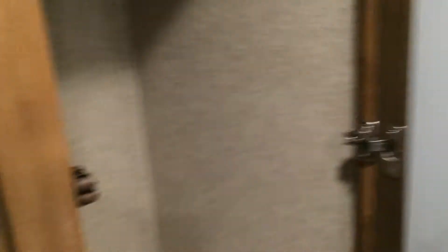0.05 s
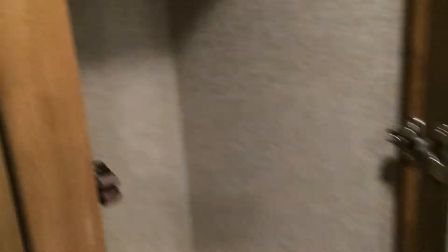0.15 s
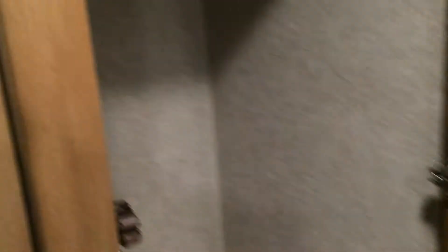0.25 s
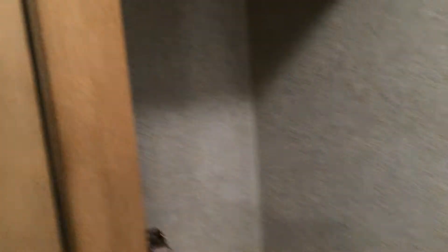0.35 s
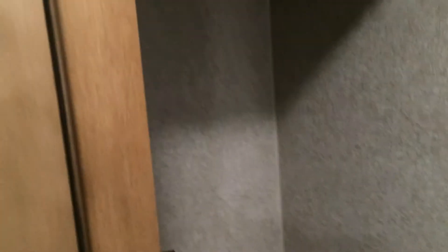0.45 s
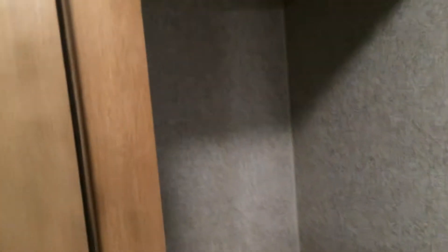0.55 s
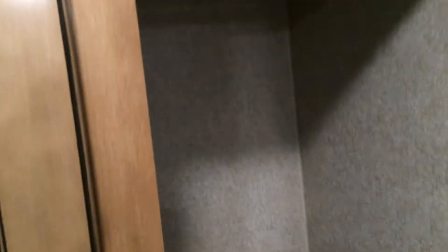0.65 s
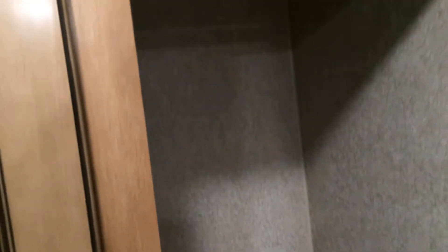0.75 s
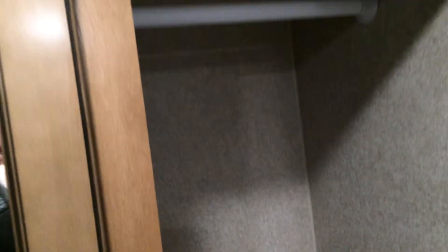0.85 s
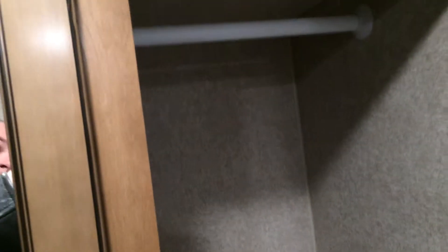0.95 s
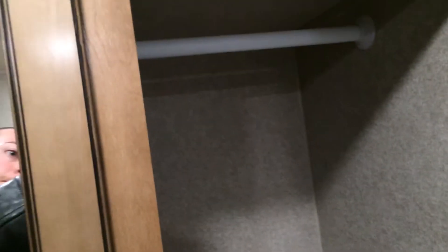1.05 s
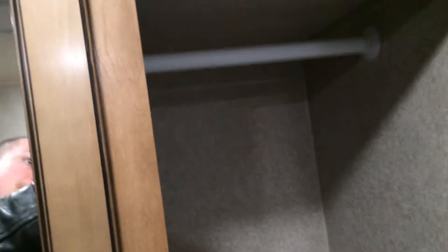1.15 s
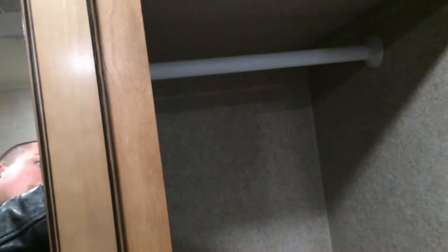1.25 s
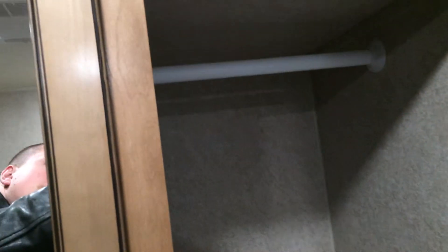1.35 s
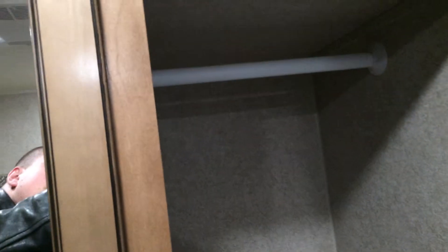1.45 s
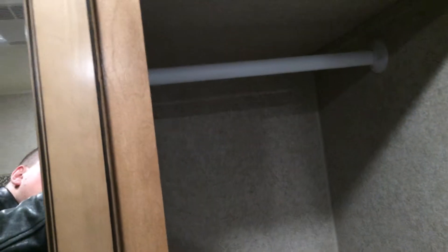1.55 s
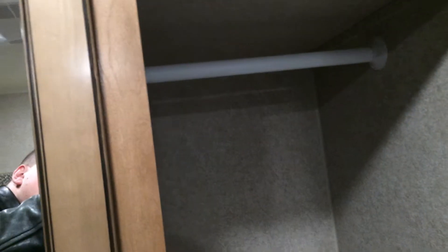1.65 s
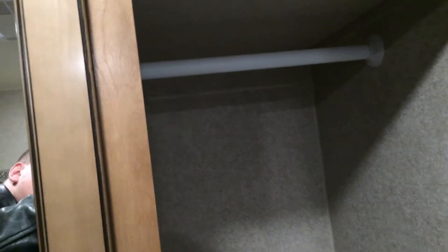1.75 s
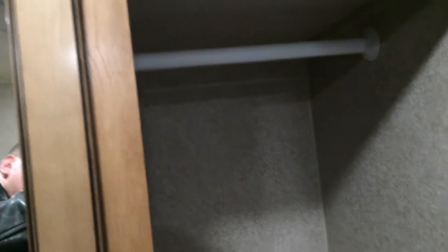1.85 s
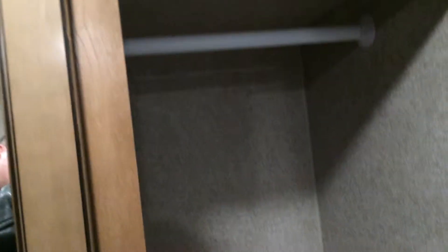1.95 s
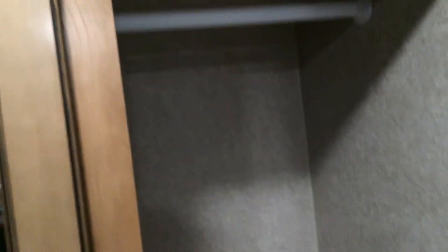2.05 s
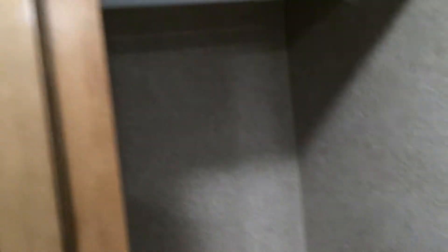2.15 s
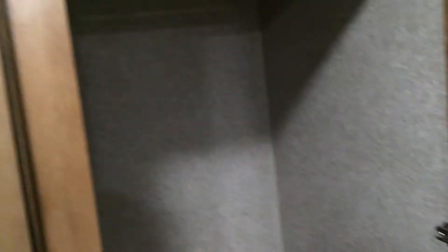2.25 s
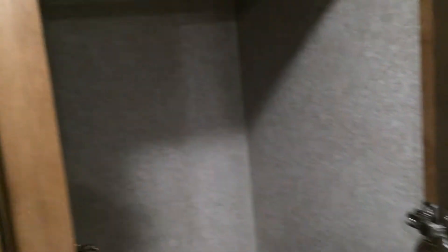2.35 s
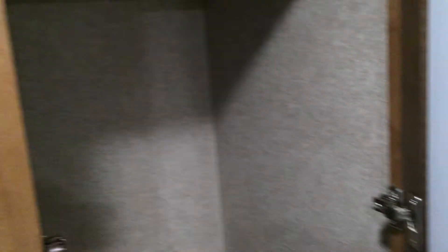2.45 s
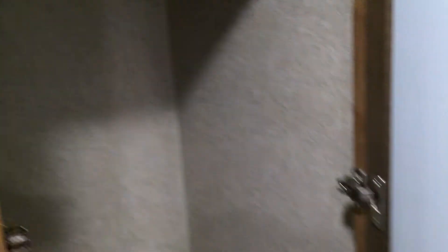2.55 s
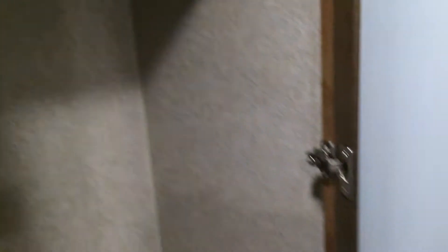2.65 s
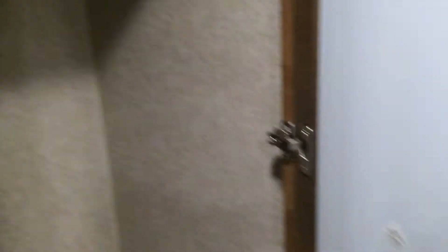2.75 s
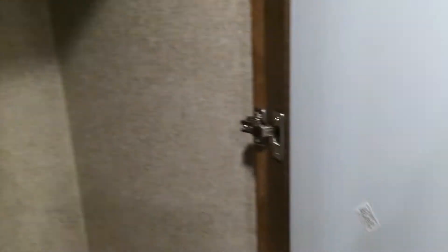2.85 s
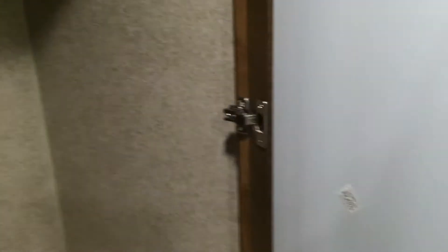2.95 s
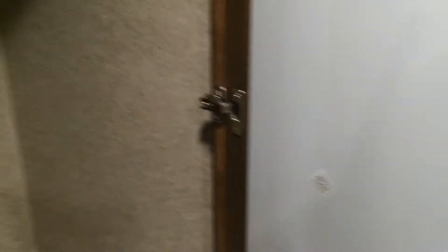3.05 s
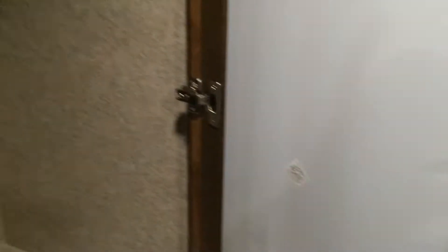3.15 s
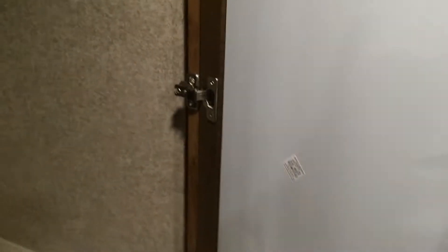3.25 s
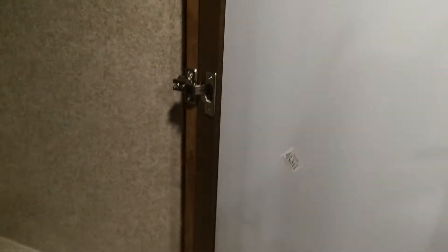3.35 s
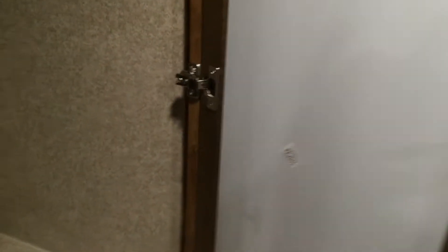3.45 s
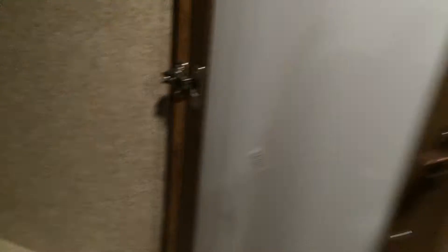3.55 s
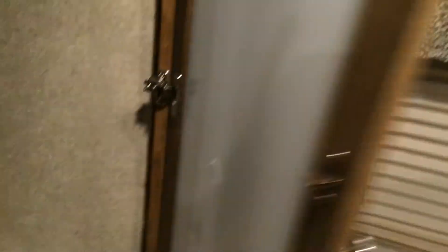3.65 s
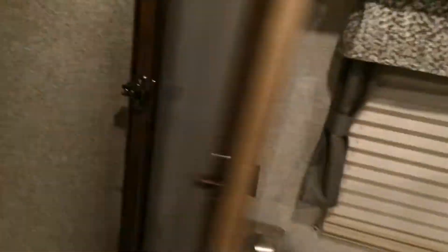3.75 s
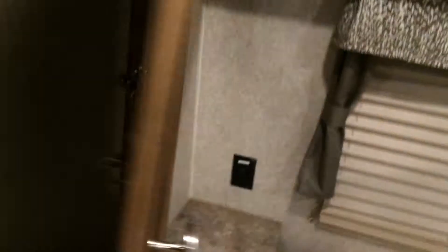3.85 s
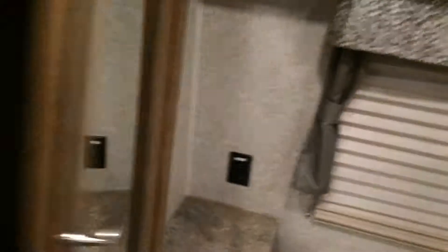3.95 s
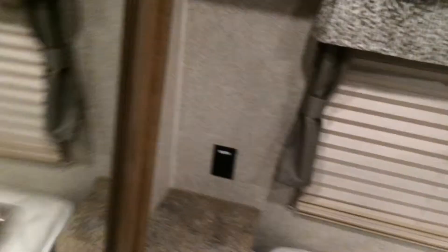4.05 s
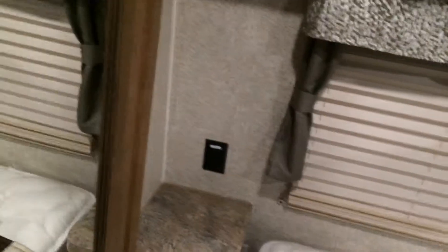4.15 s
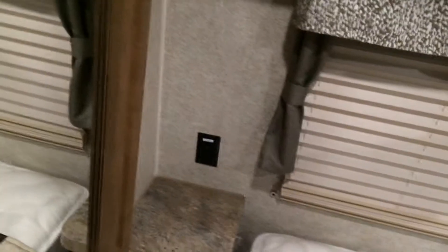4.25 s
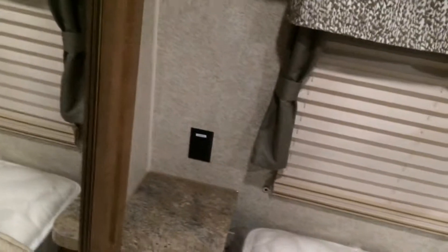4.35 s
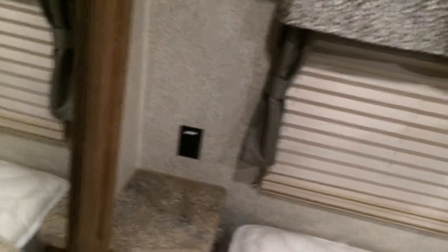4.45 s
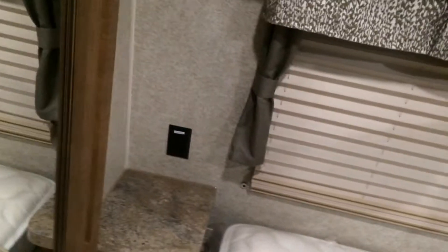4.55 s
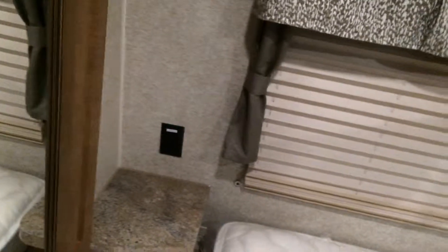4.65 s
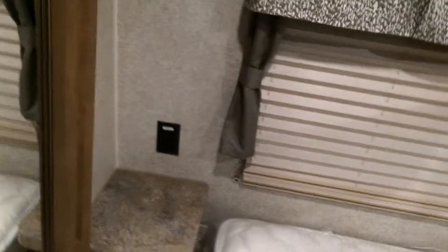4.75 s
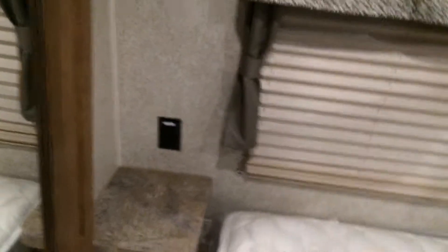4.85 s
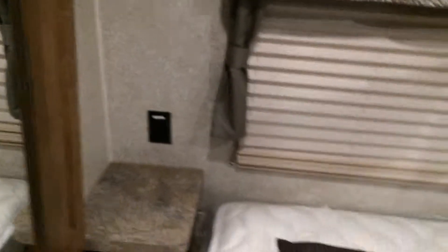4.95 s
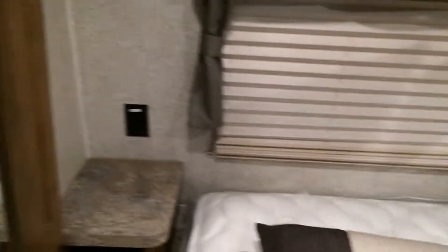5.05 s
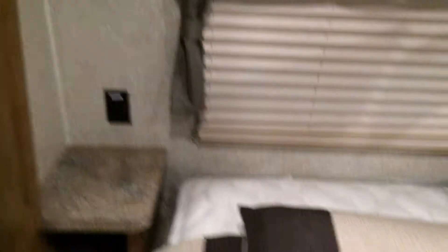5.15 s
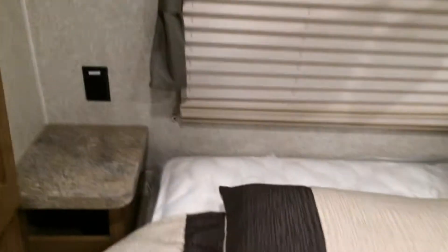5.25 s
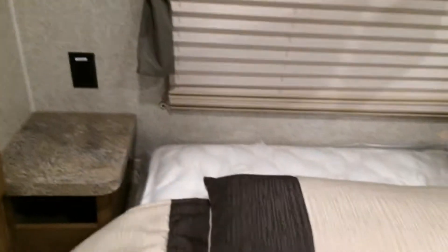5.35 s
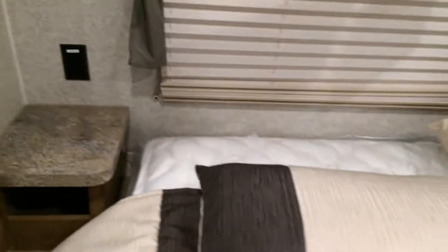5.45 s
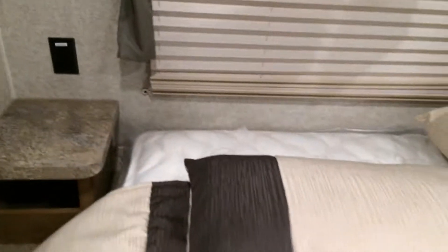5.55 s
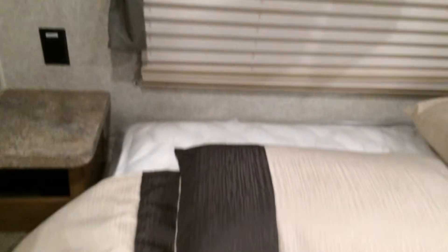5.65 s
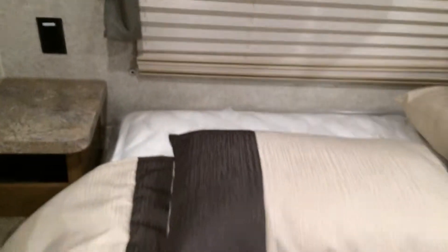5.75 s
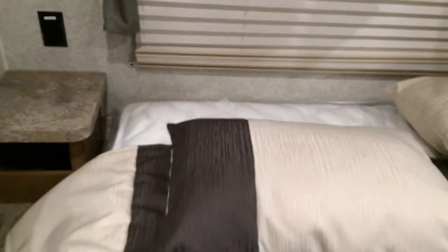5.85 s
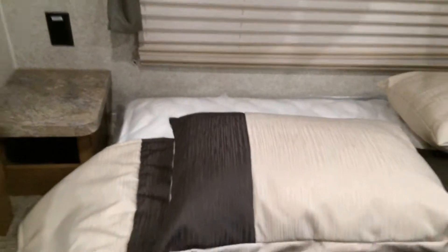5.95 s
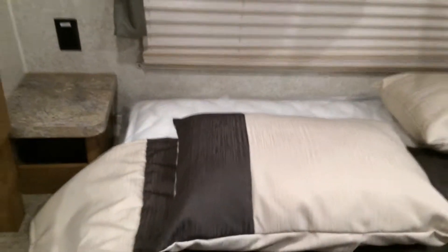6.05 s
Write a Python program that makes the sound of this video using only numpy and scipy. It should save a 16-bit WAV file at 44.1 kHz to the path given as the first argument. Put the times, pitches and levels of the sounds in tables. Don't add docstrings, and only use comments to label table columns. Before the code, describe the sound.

A small padded trailer with a steady, faint hush, heard through a small microphone near a person in a stiff jacket. From 0 to about 1 second the cloth rustles fairly strongly, hissing and creaking, with crisp snaps and a dull tap at 0.2 and 0.5. Soft low heel thumps begin near 0.7 and make the light floor sway. From 1 to 2.3 the rustle thins, with small ticks and light brushes; sharper snaps come at 2.25 and 2.6. Quieter shifting and soft steps follow, around 3.4 especially. At 4.2 a metal roller catch scrapes briefly and a wardrobe door knocks shut at 4.24, by far the loudest sound: a hard woody crack, rapid low rebounds, a shuddering panel and a short cabin ring. Steps follow at 4.4, then rustling swells again from 5 to 5.8, with snaps near 5.4, fading into gentle cloth movement by 6.

```python
import sys
import numpy as np
from scipy import signal
from scipy.io import wavfile

SR = 44100
rng = np.random.default_rng(int(sys.argv[2]) if len(sys.argv) > 2 else 0)


def unload_wav(signal):
    wavfile.write(
        sys.argv[1],
        SR,
        np.round(np.clip(np.atleast_2d(signal).T, -1, 1) * 32767).astype(np.int16),
    )


def gain_from_db(level_db):
    decades = np.asarray(level_db, float) / 20
    return 10 ** decades


N = 268613

# frequency in Hz, level in dB per Hz.
HUSH_COLOUR = [(20, -20), (35, 1.5), (120, -4), (200, -21), (330, 0), (600, -5), (1300, -9.5),
               (2500, -29.5), (4000, -16.5), (14000, -26.5), (15500, -31)]
# frequency in Hz, width in Hz, gain in dB.
WALL_COLOUR = [(185, 68, 8.5), (2365, 340, 2.5), (2740, 202, -2.5)]
# time in seconds, rustle in dB, body weight going with it in dB.
EFFORT = [(0, -51.5, 4), (.088, -42, 0), (.15, -47.5, 2), (.3, -57.5, 2.5), (.53, -47.5, -3),
          (.94, -58.5, 0), (1.5, -65.5, 0), (2.1, -74.5, 3.5), (2.7, -53.5, -3), (2.92, -64, 0.5),
          (3.25, -60, 0), (3.52, -71.5, 1.5), (4.1, -63, 7.5), (4.8, -67, -2.5), (5.03, -56.5, 1),
          (5.3, -51.5, -1.5), (5.79, -56, 2), (5.87, -64.5, 1)]
# peak in seconds, brightening in dB, rise in s, fade in s.
BRUSHES = [(.088, 4.5, 0.073, 0.064), (.19, 3.5, .01, .08), (.456, 7, .004, .05), (.535, 3, 0.052, .05),
           (1.21, 3.5, .05, 0.027), (1.4, 1, .02, .04), (1.54, 18, 0.011, 0.041), (1.81, 15.5, .02, 0.14),
           (1.92, 19.5, 0.027, .05), (2.16, 22.5, 0.022, 0.1), (2.25, 16, 0.008, 0.12),
           (2.36, 9, 0.02, 0.08), (2.6, 7.5, 0.052, 0.018), (2.89, 13, 0.098, .025), (3.29, 2, 0.055, 0.15),
           (3.44, 13.5, 0.034, 0.12), (3.568, 14.5, .015, 0.082), (3.774, 16, 0.22, 0.049),
           (4.04, 0, 0.058, 0.033), (4.852, 5.5, 0.016, 0.033), (5.175, 5.5, 0.025, .04),
           (5.24, 4.5, 0.035, .06), (5.447, 7.5, 0.19, 0.04), (5.635, 5.5, 0.037, 0.033),
           (5.76, 4.5, 0.05, 0.021), (6.05, 7, 0.048, 0.11)]
# frequency in Hz, level in dB per Hz.
CLOTH_COLOUR = [(290, -38.5), (500, -18), (603, -3), (803, -1.5), (1040, -1), (1880, 3), (2390, -2),
                (2930, -5), (6090, -10), (10500, -19), (14600, -32), (15500, -34)]
# start in seconds, peak in dB, pitch in Hz, smear in dB under the snap.
SNAPS = [(.269, -37.5, 1660, -2), (.341, -33, 2350, -19), (.454, -38, 2240, -12), (.829, -41.5, 634, -24),
         (1.014, -45.5, 2000, 2), (1.292, -48, 576, 6), (1.359, -49.5, 1740, -1), (1.535, -43.5, 640, 0),
         (1.805, -47, 447, -13), (2.25, -30.5, 2180, -9), (2.356, -42, 1740, -8), (2.578, -28, 2290, -16),
         (2.585, -29.5, 2070, -17), (2.734, -39.5, 1650, 0), (2.981, -45.5, 680, -5),
         (3.055, -40.5, 1960, -1), (3.274, -43.5, 1780, -1), (3.429, -68, 700, -9), (3.767, -42, 1390, -4),
         (4.106, -48, 920, -5), (4.846, -41.5, 1010, -1), (5.357, -37.5, 2250, 7), (5.426, -31, 2500, -4.5),
         (6.035, -45, 2330, -1)]
# start in seconds, peak in dB, pitch in Hz, relative smear in dB.
CREASES = [(.05, -53, 1430, -14), (.409, -42, 2200, -9), (.478, -31.5, 820, -15), (.661, -37, 1850, 3),
           (.709, -41.5, 506, -2), (.752, -36.5, 2290, -18), (1.147, -40.5, 1760, 2),
           (1.205, -37.5, 2230, -16), (1.4, -35.5, 1380, -4.5), (1.91, -42, 1940, -3.5),
           (2.162, -45.5, 2210, 3), (2.28, -45, 2420, -7), (2.308, -44, 1540, -11),
           (2.657, -44.5, 1800, -5), (3.846, -44, 630, 0), (3.93, -48, 2250, -4), (3.976, -44.5, 1890, -4),
           (4.011, -36.5, 790, -10), (4.504, -57, 468, -9), (4.896, -41, 1920, -19),
           (4.938, -61, 1960, -12), (5.171, -32.5, 2370, 1), (5.264, -36, 1980, 3), (5.717, -35.5, 1880, 6)]
# start in seconds, peak in dB, pitch in Hz, relative smear in dB.
TAPS = [(.197, -24.5, 2430, -6), (.514, -31, 2020, 7), (.905, -34, 423, -2.5), (1.632, -40, 1170, -5),
        (1.838, -37, 590, 4), (2.18, -37.5, 510, 2), (2.518, -40, 2260, -1), (3.569, -40, 2440, 0),
        (3.647, -39, 1770, -13), (4.038, -33, 1810, -26), (4.132, -43.5, 2020, -11), (4.478, -39, 2810, -7),
        (4.794, -42.5, 2340, -19.5), (5.778, -39.5, 1870, -16), (5.875, -50.5, 401, -9),
        (5.948, -45, 1592, -6)]
# start in seconds, peak in dB, floor pitch in Hz, T60 in s, relative overtone in dB.
STEPS = [(0.663, -35, 63.2, 0.39, -3.5), (0.713, -40, 58.3, 0.65, -5), (1.532, -43, 71.2, 0.87, -1.5),
         (1.599, -47, 57.7, 0.6, -0.5), (2.337, -42, 70.2, 0.84, -20), (3.072, -46.5, 72, 0.67, -6),
         (3.414, -38, 61.7, 0.63, -25), (3.461, -34, 59.7, 0.36, -10), (3.544, -42, 69.7, 0.24, -24),
         (4.092, -39, 68, 0.36, -8), (4.425, -37, 74, 0.98, -15), (4.55, -36, 74, 0.31, -12),
         (5.304, -38, 75, 0.46, -26), (5.344, -39.5, 80.6, 0.34, -19), (5.403, -44, 78, 0.32, 3),
         (5.736, -36, 87, 0.19, -2)]
# time in seconds, scrape in dB.
CATCH_SCRAPE = [
    (4.2, -62),
    (4.2205, -48),
    (4.2222, -22),
    (4.227, -18),
    (4.231, -22),
    (4.2365, -24),
    (4.2385, -31),
    (4.242, -31),
]
# frequency in Hz, level in dB, T60 in s.
CATCH_MODES = [(1194, -16.5, .014), (2020, -1.5, .008), (2820, -3.5, 0.009), (3260, -2.5, 0.0097),
               (3750, -4.5, 0.0073)]
# start in seconds, push in dB, contact
# softness as top frequency in Hz.
BLOWS = [
    (4.205, -25, 120),
    (4.230, -15.5, 247),
    (4.242, -7.5, 401),
    (4.253, -12.5, 297),
    (4.262, -6.5, 398),
    (4.278, -7, 350),
    (4.289, -28, 298),
    (4.2971, -14.5, 249),
    (4.312, -16.5, 304),
    (4.331, -24, 250),
]
# frequency in Hz, level in dB, T60 in s.
PANEL_MODES = [(55.46, -6, 0.4), (74, -1.5, 0.78), (90.9, 4, 0.16), (111, -6, 0.32), (140.3, -1, 0.22),
               (164, -8.5, 0.34), (183.8, 2.5, 0.17), (206.6, -2.5, 0.24), (271.4, -7.5, 0.17),
               (290, -22, 0.13), (342, -16, 0.38), (382.7, -12, .3), (494, -17, 0.073)]
# frequency in Hz, level in dB, T60 in s.
FRAME_MODES = [(700, -12.5, 0.19), (868, -8, 0.28), (1196, 2, 0.13), (1304, -5, 0.17), (1597, -8, 0.49),
               (1750, -17.5, 0.14), (2100, -9.5, 0.095), (2840, 0, 0.095), (4180, -20, 0.121)]
# delay after it in seconds, level in dB, top frequency in Hz.
CONTACTS = [
    (.0003, -1, 11000),
    (.0017, -2, 7000),
    (.0034, -6, 5500),
]
# frequency in Hz, level in dB per Hz.
KNOCK_COLOUR = [(250, -5), (340, -9), (870, -3.5), (1200, -11), (2100, -6.5), (3000, -13), (4000, -13),
                (5200, -18), (6500, -21), (9700, -29), (15500, -58)]
# frequency in Hz, T60 in s.
KNOCK_T60 = [(250, 0.31), (600, 0.22), (1200, 0.29), (2500, 0.18), (2950, 0.11), (3400, 0.31), (5000, 0.31),
             (8000, 0.24), (14000, 0.082)]


def rms_one(x):
    return x / np.sqrt(np.mean(x ** 2) + 1e-20)


def in_time(rows):
    s, *columns = np.transpose(rows)
    return [np.interp(np.arange(N) / SR, s, column) for column in columns]


def at_hz(points, hz):
    points = np.array(points)
    return np.interp(np.log(hz), np.log(points[:, 0]), points[:, 1])


def add(out, s, piece):
    i = round(s * SR)
    out[i:i + len(piece)] += piece[:N - i]


def dying(t60, count):
    return gain_from_db(-60 * np.arange(count) / SR / max(t60, .003))


def drift(rate_hz):
    r = np.exp(-80 * np.pi * rate_hz / SR)
    white = rng.standard_normal(N // 40 + 2002)
    slow = signal.lfilter([1], [1, -2 * r, r * r], white)[2000:]
    return np.interp(np.arange(N) / 40, np.arange(len(slow)), rms_one(slow - slow.mean()))


def ring(clicks, hz, t60):
    r, w = gain_from_db(-60 / (t60 * SR)), 2 * np.pi * hz / SR
    return signal.lfilter([0, np.sin(w)], [1, -2 * r * np.cos(w), r * r], clicks + 1e-18)


def cut(x, hz, kind, order=2):
    return signal.sosfilt(signal.butter(order, hz, kind, fs=SR, output="sos"), x)


def bands(white, low_hz, count=3):
    edges = low_hz * 2 ** np.arange(0, np.log2(17000 / low_hz), 1 / count)
    for k, (low, high) in enumerate(zip(edges, edges[1:])):
        yield np.sqrt(low * high), cut(white[k % 2], [low, high], "band")


def bell(x, hz, width_hz, db):
    r, w = np.exp(-np.pi * width_hz / SR), 2 * np.pi * hz / SR
    top = np.array([1, 0, -1]) * (1 - r * r) / 2
    return x + (gain_from_db(db) - 1) * signal.lfilter(top, [1, -2 * r * np.cos(w), r * r], x)


def walls(x):
    for hz, width_hz, db in WALL_COLOUR:
        x = bell(x, hz, width_hz, db)
    return x


def cabin_air():
    slices = bands(rng.standard_normal((2, N)), 27.76)
    return gain_from_db(-67.5) * rms_one(sum(gain_from_db(at_hz(HUSH_COLOUR, hz)) * x for hz, x in slices))


def movement():
    effort_db, weight_db = in_time(EFFORT)
    t = np.arange(N) / SR
    brush_db = sum(np.interp(t, [s - rise_s, s, s + fade_s], [0, db, 0]) for s, db, rise_s, fade_s in BRUSHES)
    rustle_db = effort_db + 0.22 * brush_db
    bright_db = 0.63 * np.minimum(effort_db + 61, 0) + brush_db
    mean_db = effort_db.mean()
    rub_db = -4 + 0.99 * (effort_db - mean_db) + mean_db + weight_db
    rest_db, move_db, step_db, sway_t60 = -66.5, -7.5, -17, 2.03
    sway_power = gain_from_db(rest_db) ** 2 + gain_from_db(effort_db + move_db + 1.8 * weight_db) ** 2
    for s, peak_db, *_ in STEPS:
        add(sway_power, s, (gain_from_db(peak_db + step_db) * dying(sway_t60, SR)) ** 2)
    return rustle_db, bright_db, rub_db, 10 * np.log10(sway_power)


def floor_sway(sway_db):
    return gain_from_db(sway_db) * rms_one(cut(rng.standard_normal(N), [45, 130], "band"))


def rubbing(rub_db):
    pressure = gain_from_db(rub_db - 1.0 + 1.9 * drift(23))
    return pressure * rms_one(cut(rng.standard_normal(N), [150, 600], "band"))


def jacket(rustle_db, bright_db, grain_db, patchy_db, per_s):
    sizes = gain_from_db(grain_db * np.minimum(rng.exponential(1, (2, N)), 5)) * rng.standard_normal((2, N))
    grains = sizes * (rng.random((2, N)) < per_s / SR)
    folds = drift(3.3)
    tilt_db = bright_db - np.median(bright_db)
    total = 0
    for hz, x in bands(grains, 449, count=4):
        share = np.clip(np.log2(hz / 2500), 0, 1)
        swell_db = patchy_db * (1.26 * folds + 1.02 * drift(25))
        total = total + gain_from_db(at_hz(CLOTH_COLOUR, hz) + share * tilt_db + swell_db) * x
    return gain_from_db(rustle_db) * total / np.sqrt(np.mean(cut(total, [800, 3500], "band") ** 2))


def creaks(rustle_db, per_s, cycles):
    slips = gain_from_db(5.4 * np.minimum(rng.exponential(1, N), 4)) * rng.choice([-1, 1], N)
    slips = slips * (rng.random(N) < per_s * gain_from_db(5 * drift(9)) / SR)
    pitches, dealt = np.geomspace(600, 3600, 16), rng.integers(0, 16, N)
    patches = sum(ring(slips * (dealt == k), hz, cycles / hz) for k, hz in enumerate(pitches))
    return gain_from_db(rustle_db) * rms_one(patches)


def ticks():
    # bright edge dB, smear T60 s, cloth band dB, ring dB
    kinds = [(SNAPS, (-5.5, 0.22, -3, -28)), (CREASES, (-16, .17, -5, -25)), (TAPS, (-34, .12, -5.5, -24))]
    rows = sorted((*row, *kind) for table, kind in kinds for row in table)
    out, length = np.zeros(N), round(.25 * SR)
    noise = rng.standard_normal((len(rows), 2, length))
    noise[:, :, 0] = 3.5
    snap = dying(.012, length)
    for (s, peak_db, hz, smear_db, bright_db, t60, cloth_db, ring_db), (dull, sharp) in zip(rows, noise):
        shape = snap + gain_from_db(min(smear_db, 0)) * dying(np.clip(t60, .01, .4), length)
        body = cut(dull * shape, [hz / 1.92, hz * 1.46], "band")
        body = body + gain_from_db(cloth_db) * cut(dull * shape, [1200, 2600], "band")
        body = body + gain_from_db(ring_db) * ring(dull * snap, hz, 0.032)
        edge = cut(sharp * shape, [3300, 8000], "band", order=1)
        piece = body / np.abs(body).max() + gain_from_db(bright_db + 2.5) * edge / np.abs(edge).max()
        add(out, s, gain_from_db(peak_db - 1.0) * piece)
    return out


def steps():
    out, push = np.zeros(N), np.zeros(SR)
    push[:200] = np.hanning(200) / 100
    heel = cut(push, 120, "low")
    for s, peak_db, hz, t60, over_db in STEPS:
        over_hz = 2.03 * hz
        low = ring(heel, hz, t60) + 0.48 * ring(heel, hz * 1.2, t60 * 1.3)
        over = ring(push, over_hz, t60 * .6) - .7 * ring(push, over_hz * 1.27, t60 * .45)
        add(out, s, gain_from_db(peak_db) * (low + gain_from_db(over_db) * over))
    return out


def catch():
    scrape_db, = in_time([(0, -200), (4.19, -200), *CATCH_SCRAPE, (4.2425, -200)])
    clicks = rng.standard_normal(N) * (rng.random(N) < 9000 / SR) * gain_from_db(scrape_db)
    out = sum(gain_from_db(db - 13.5) * ring(clicks, hz, t60) for hz, db, t60 in CATCH_MODES)
    out = out + gain_from_db(9.0) * cut(clicks, [600, 4300], "band")
    out = out + gain_from_db(-20.0) * cut(clicks, [4300, 10000], "band")
    out = gain_from_db(-12) * out / np.abs(out).max()
    touch = rng.standard_normal(2000) * dying(0.014, 2000)
    add(out, 4.2215, gain_from_db(-31) * cut(touch, [4500, 15000], "band"))
    return out


def panel():
    pushes, click = np.zeros(N), np.eye(1, 2000)[0]
    for s, push_db, contact_hz in BLOWS:
        add(pushes, s, gain_from_db(push_db) * cut(click, contact_hz, "low"))
    return sum(gain_from_db(db - 13.5) * ring(pushes, hz, t60) for hz, db, t60 in PANEL_MODES)


def frame(length):
    chatter = rng.standard_normal((len(FRAME_MODES), length)) * dying(0.011, length)
    return sum(gain_from_db(db - 34.5) * ring(hit, hz, min(t60, .3)) for (hz, db, t60), hit in zip(FRAME_MODES, chatter))


def cabin_tail(length):
    slices = bands(rng.standard_normal((2, length)), 245.6, count=6)
    tail = sum(gain_from_db(at_hz(KNOCK_COLOUR, hz)) * x * dying(at_hz(KNOCK_T60, hz), length) for hz, x in slices)
    build_s = 0.0042
    return walls(tail * (1 - 0.37 * np.exp(-np.arange(length) / (build_s * SR))))


def crack(length):
    clicks = np.zeros(length)
    for s, db, top_hz in CONTACTS:
        snap = rng.standard_normal(200) * dying(.007, 200)
        add(clicks, s, gain_from_db(db) * cut(snap / np.sqrt(np.sum(snap ** 2)), top_hz, "low"))
    high_ring = ring(clicks, 6200, .008) + .5 * ring(clicks, 7600, .004)
    out = cut(clicks, [1800, 10000], "band", order=3) + gain_from_db(-13) * high_ring
    return out / np.abs(out).max()


def door():
    out, knock_s, length = panel(), 4.2427, round(.7 * SR)
    add(out, knock_s, frame(length) + gain_from_db(-1.0) * cabin_tail(length))
    add(out, knock_s, gain_from_db(-5.5) * crack(length))
    return out


def scene():
    rustle_db, bright_db, rub_db, sway_db = movement()
    rub = rubbing(rub_db)
    sway = floor_sway(sway_db)
    cloth = jacket(rustle_db, bright_db, grain_db=3.5, patchy_db=1.9, per_s=10000)
    cloth = cloth + creaks(rustle_db - 13.5, per_s=250, cycles=35)
    return (cabin_air() + walls(cloth + rub) + sway + ticks() + steps() + catch() + door())[None]


def low_pass(x):
    return signal.sosfilt(signal.butter(12, 15400, fs=SR, output="sos"), x)


def record(dry):
    wet = cut(dry, 26, "high", order=3)
    wet = 1.5 * np.tanh(wet / 1.5)
    wet = signal.sosfilt(signal.cheby2(12, 60, 17000, fs=SR, output="sos"), wet)
    return low_pass(wet)


dry = scene()
out = record(dry)
unload_wav(out)
```